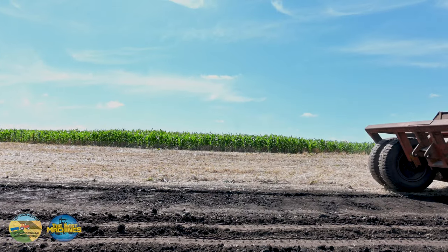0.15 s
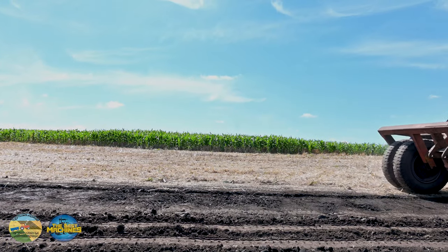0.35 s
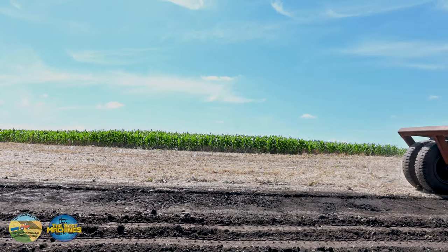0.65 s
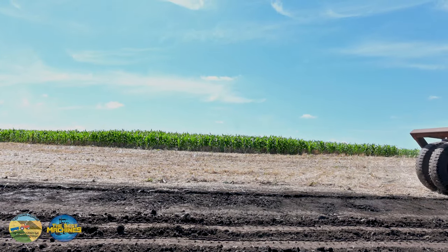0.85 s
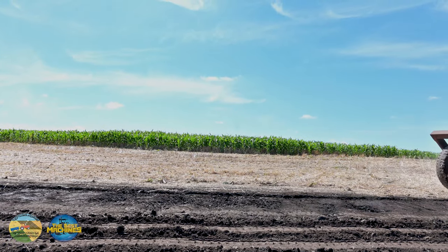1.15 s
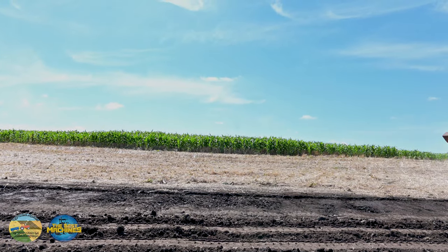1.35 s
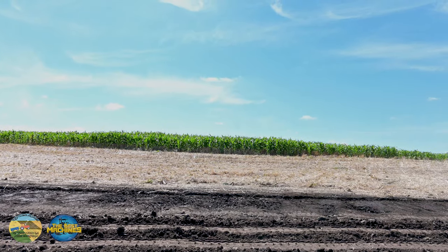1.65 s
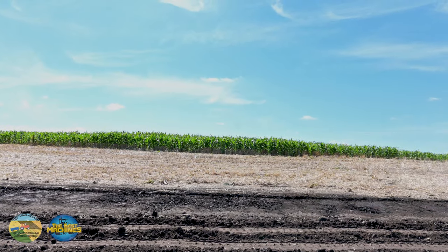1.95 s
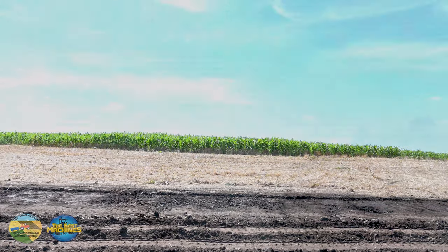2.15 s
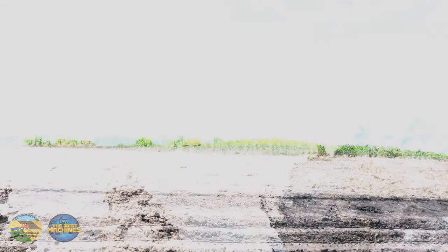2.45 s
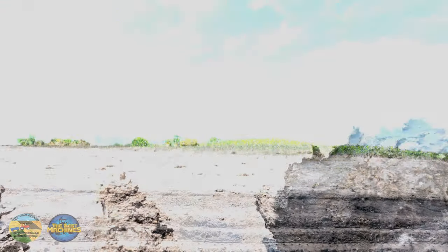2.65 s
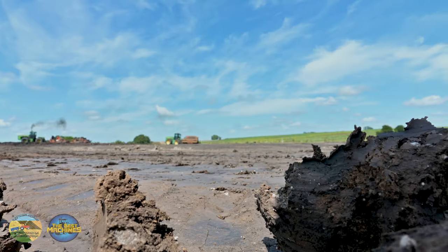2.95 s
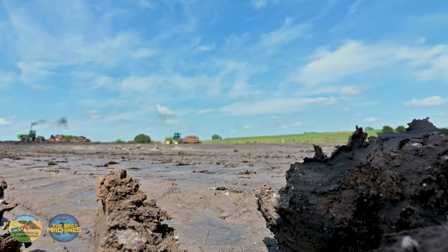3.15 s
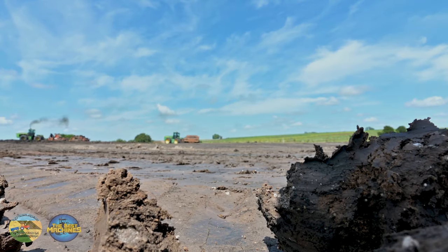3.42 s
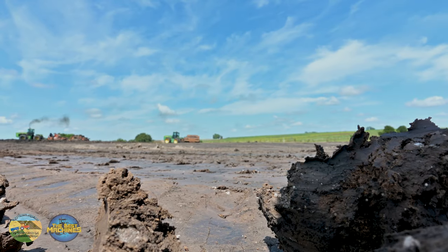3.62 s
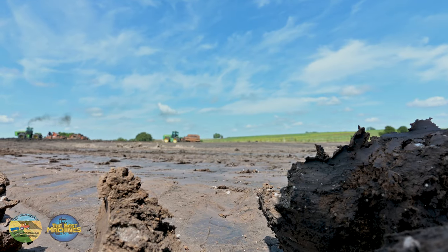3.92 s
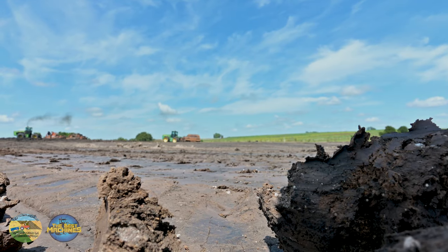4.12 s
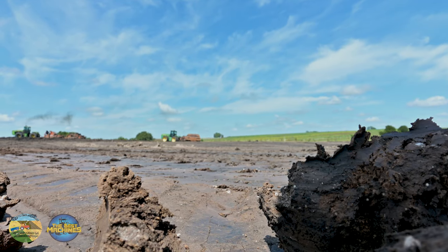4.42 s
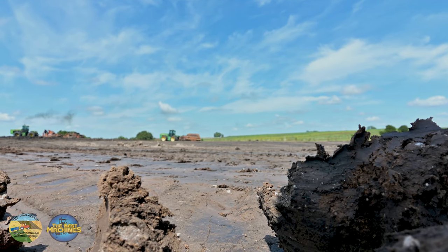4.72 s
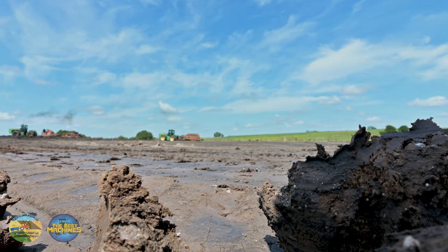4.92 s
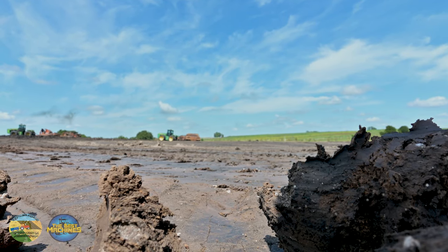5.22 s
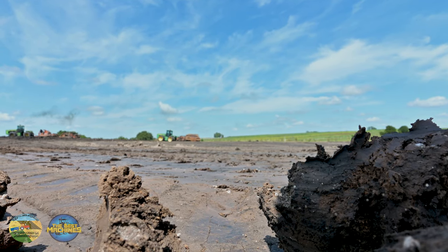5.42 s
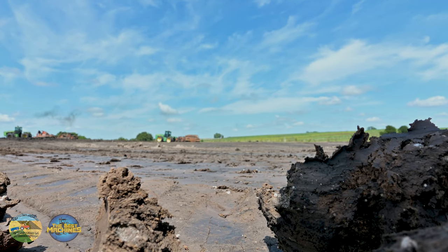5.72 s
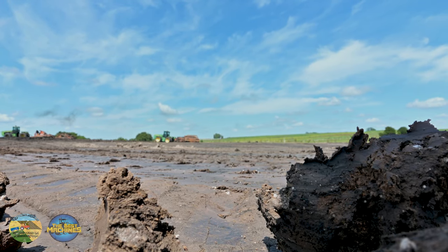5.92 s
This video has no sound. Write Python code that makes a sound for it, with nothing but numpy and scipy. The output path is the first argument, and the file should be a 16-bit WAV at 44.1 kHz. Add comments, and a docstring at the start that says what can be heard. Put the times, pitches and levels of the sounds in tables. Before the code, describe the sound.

Heavy tractor engine drone with scraper bowl clanks, a sudden cut, then a second, higher diesel hum swells up, ticking and buzzing in an open field.

```python
"""A diesel tractor hums and clatters steadily while a scraper's steel bowl knocks and rubs and a thin squeal arches.
That scene is cut off abruptly; a second six-cylinder tractor fades in, takes up its load and draws nearer, ticking.
Engine tones are multiples of the firing rate; rumble, clatter, ringing panels and hiss are shaped noise.
Knocks strike decaying bowl modes and shove the air; the squeal is a gliding sine of unsteady strength.
"""
import sys
import numpy as np
from scipy import signal
from scipy.fft import rfft, irfft
from scipy.io import wavfile

SR = 44100
rng = np.random.default_rng(int(sys.argv[2]) if len(sys.argv) > 2 else 0)


def transcribe(u):
    """Save the signal u as a 16-bit wav file named by the first command-line argument.

    u: samples, shape (n,) or (channels, n), limited to [-1, 1]; the rate is SR.
    q: integer samples, one column per channel.
    """
    v = np.clip(np.atleast_2d(u).T, -1, 1)
    q = np.round(v * 32767).astype(np.int16)
    wavfile.write(sys.argv[1], SR, q)


N = 267687
TIME = np.arange(N) / SR  # s
FREQS = np.maximum(np.arange(N // 2 + 1) * SR / N, 1)  # Hz, kept positive for logarithms


def from_db(db):
    """Decibels to amplitude gain."""
    return 10 ** (np.asarray(db) / 20)


def rms_one(x):
    """Scale to unit rms."""
    return x / np.sqrt(np.mean(x ** 2) + 1e-20)


def in_time(rows):
    """Each column of a time table, linear between rows, at every sample."""
    t_s, *columns = np.transpose(rows)
    return [np.interp(TIME, t_s, column) for column in columns]


def in_frequency(rows):
    """Each column of a spectrum table, linear in log frequency, at every bin."""
    hz, *columns = np.transpose(rows)
    return [np.interp(np.log(FREQS), np.log(hz), column) for column in columns]


def ramp(start_s, length_s):
    """Linear rise from 0 to 1, held either side."""
    return np.clip((TIME - start_s) / length_s, 0, 1)


def drift(rate_hz):
    """Slow random wander of spread 1: noise through two equal poles at rate_hz."""
    step = 40  # samples per slow point
    r = np.exp(-2 * np.pi * step * rate_hz / SR)
    noise = rng.standard_normal(N // step + 2002)
    slow = signal.lfilter([1], [1, -2 * r, r * r], noise)[2000:]  # drop the settling
    return np.interp(np.arange(N) / step, np.arange(len(slow)), rms_one(slow))


def colour(x, gain):
    """Filter by a gain per frequency; rms 1."""
    return rms_one(irfft(rfft(x) * gain, N))


def below(hz):
    """Gain of a steep low-pass."""
    return 1 / np.sqrt(1 + (FREQS / hz) ** 8)


def above(hz):
    """Gain of the power-complementary high-pass."""
    return np.sqrt(1 - below(hz) ** 2)


def resonate(x, resonances):
    """Parallel two-pole resonances of alternating sign; rms 1."""
    out = 0
    for k, (hz, width_hz, db) in enumerate(resonances):
        r = np.exp(-np.pi * width_hz / SR)
        poles = [1, -2 * r * np.cos(2 * np.pi * hz / SR), r * r]
        band = signal.lfilter([1 - r * r, 0, r * r - 1], poles, x)
        out = out + (-1) ** k * from_db(db) * band
    return rms_one(out)


def place(sound, stereo):
    """Row 0 arrives from one direction; row 1, scattered by ground and machine, differs between the ears."""
    pan_db, likeness, lead_rad = in_frequency(stereo)
    apart = above(320) ** 2  # the bass is kept mono, alike in both ears
    pan_db = apart * pan_db
    likeness = 1 - apart * (1 - np.clip(likeness, 0, 1))
    lead_rad = apart * lead_rad
    direct, scattered = rfft(sound)
    sides = np.array([[1], [-1]])  # left, right
    ears = np.sqrt((1 + likeness) / 2) * direct + sides * np.sqrt((1 - likeness) / 2) * scattered
    pan = from_db(sides * pan_db / 2)
    pan = pan / np.sqrt(np.mean(pan ** 2, axis=0))  # keep the power of both ears
    return irfft(ears * pan * np.exp(.5j * sides * lead_rad), N)


def tones(firings, rows):
    """Turning parts sound at fixed multiples of the firing rate, wavering in strength and phase."""
    out = 0
    for multiple, rms_db, unsteady in rows:
        wander = (drift(10.1) + 1j * drift(2.3)) / np.sqrt(2)
        waver = (1 + unsteady * wander) / np.sqrt(1 + unsteady ** 2)
        start = rng.random((2, 1))  # starting phase per row, cycles
        wave = np.real(waver * np.exp(2j * np.pi * (multiple * firings + start)))
        out = out + np.sqrt(2) * from_db(rms_db) * wave
    return out


def bursts(firings, cylinders_db, decay, uneven_db):
    """Each firing opens a burst dying within a share of the interval; cylinders and strokes differ. Rms 1."""
    stroke, since = np.divmod(firings, 1)
    stroke = stroke.astype(int)
    chance = rng.standard_normal(size=1024)
    cylinder_db = np.array(cylinders_db)[stroke % len(cylinders_db)]
    strength_db = cylinder_db + uneven_db * chance[stroke % len(chance)]
    return rms_one(from_db(strength_db) * (np.exp(-since / decay) - np.exp(-8 * since / decay)))


def pulsing(gate, depth):
    """Turbulence noise; a share of its power, depth, follows the bursts."""
    depth = np.clip(depth, 0, 1)
    return np.sqrt(1 - depth + depth * gate ** 2) * rng.standard_normal((2, N))


def cyclic(firings, repeat):
    """Vibration noise; a share of its power comes back alike on every six-firing engine cycle."""
    repeat = np.clip(repeat, 0, 1)
    cycle = rng.standard_normal(size=(2, 3400))
    angle = (firings / 6 % 1 * cycle.shape[1]).astype(int)
    return np.sqrt(repeat) * cycle[:, angle] + np.sqrt(1 - repeat) * rng.standard_normal((2, N))


def hauling_tractor():
    """Steady speed and load: hum, rumble, uneven exhaust bark, ringing panels and dull clatter."""
    # turning parts: [f/firing rate, level/dB rms, unsteadiness]
    tone_rows = [(1, -41, 0.28), (2, -46.5, 0.26), (3, -53.5, 0.79), (1.273, -46.5, 0.253),
                 (1.9, -50.5, 0.93), (4.97, -55.5, 1), (3.604, -44, 0.34), (6.5, -57, 0.7)]
    # roar spectrum: [f/Hz, relative density/dB per Hz]
    roar_rows = [(20, -19), (45, -7.5), (130, -0.5), (300, -5), (520, -17), (800, -24.5), (1400, -20.5),
                 (2700, -26.5), (3600, -33), (6500, -35.5), (8000, -41.5), (11000, -50.5), (15800, -51.5)]
    # exhaust pipe resonances: [f/Hz, width/Hz, relative level/dB]
    pipe = [(310, 57, -1), (518, 53, -1.5), (564, 180, -15)]
    # steel panel resonances: [f/Hz, width/Hz, relative level/dB]
    panel_modes = [(1204, 39, 4), (1334, 76, 1.5), (1560, 61, 1), (1916, 120, 1.5), (2310, 150, -2),
                   (2484, 28, 3.5), (2740, 230, -1.5), (4690, 1100, -13.5), (6750, 210, -13)]
    # cylinders in firing order: [relative strength/dB]
    cylinders_db = [8.5, 3.5, 8.5, 7, 3.5, -12]
    firing_hz = 69.5
    firings = firing_hz * TIME
    roar = from_db(in_frequency(roar_rows)[0])
    gate = bursts(firings + 2.5, cylinders_db, decay=0.47, uneven_db=4.0)
    rumble = from_db(-39.5) * colour(cyclic(firings, repeat=0.28), roar * below(830))
    bark = from_db(-50.5) * colour(resonate(pulsing(gate, depth=0.62), pipe), below(1121))
    panels = from_db(-54.0 + 2.7 * drift(7.0)) * resonate(pulsing(gate, depth=0.16), panel_modes)
    clatter_gain = from_db(-50.5 + 0.13 * drift(11))
    clatter = clatter_gain * colour(pulsing(gate, depth=0.094), roar * above(530))
    return tones(firings, tone_rows) + rumble + bark + panels + clatter


def scraper():
    """The bowl bumps in its pins: knocks strike decaying modes and shove the air; steel rubs as shaped noise."""
    # knocks: [t/s, level/dB]
    knocks = [(0.251, -28.5), (0.335, -34), (1.199, -26.5), (1.903, -27), (2.006, -30), (2.06, -24),
              (2.102, -29), (2.183, -32), (2.232, -26.5), (2.271, -29), (2.326, -28.5)]
    # earth-damped bowl modes: [f/Hz, relative level/dB, t60/s]
    bowl = [(222, -4, 0.048), (390, -10, 0.021), (570, -6, 0.024), (746, -9, 0.013), (972, -14, 0.022),
            (1376, -25, 0.051), (1900, -16.5, .02)]
    # steel rubbing on steel: [centre t/s, level/dB, 1/e half-width/s]
    rubs = [(0.005, -43.5, 0.015), (1.05, -46.5, 0.03)]
    bowl_gain_db, shove_gain_db, shove_hz = 1.0, 0.8, 188
    at = [round(t_s * SR) for t_s, db in knocks]
    knock_db = np.array(knocks)[:, 1:]
    # every knock strikes the modes in a slightly different balance
    strengths = from_db(knock_db + 0.53 * rng.standard_normal((len(knocks), len(bowl))))
    out = np.zeros((2, N))
    for k, (hz, db, t60_s) in enumerate(bowl):
        blows = np.zeros(N)
        blows[at] = strengths[:, k] * from_db(bowl_gain_db + db)
        r = np.exp(-np.log(1000) / (t60_s * SR))
        w = 2 * np.pi * hz / SR
        poles = [1, -2 * r * np.cos(w), r * r]
        out[0] += (-1) ** k * signal.lfilter([0, np.sin(w)], poles, blows + 1e-18)
    # the bowl's mass shoves the air through one sine cycle per knock
    shove = np.zeros(N)
    shove[at] = from_db(shove_gain_db + knock_db[:, 0])
    swing = np.arange(round(SR / shove_hz))
    out[0] -= signal.fftconvolve(shove, np.sin(2 * np.pi * swing / len(swing)))[:N]
    rubbing = sum(from_db(db) * np.exp(-((TIME - t_s) / width_s) ** 2) for t_s, db, width_s in rubs)
    rub_modes = [(1005, 79, -9), (1290, 250, -21), (1880, 250, -15)]  # f/Hz, width/Hz, relative level/dB
    scrape = colour(resonate(rng.standard_normal((2, N)), rub_modes), below(2500))
    return out + rubbing * scrape


def squeal():
    """Running gear squeals faintly: a thin broken sine glides up and sinks again."""
    start_s, length_s = 1.78, 0.61
    low_hz, rise_hz, jitter_hz = 11200, 2100, 400
    level_db, fall_db = -78.5, 7
    progress = ramp(start_s, length_s)
    arch = np.abs(np.sin(np.pi * progress))
    hz = low_hz + rise_hz * arch + jitter_hz * drift(200)
    fading = from_db(level_db - fall_db * progress)
    strength = fading * np.sqrt(arch) * drift(60)
    return strength * np.sqrt(2) * np.sin(2 * np.pi * np.cumsum(hz) / SR)


def near_speed():
    """Firings per second: the engine sags under load, then its governor hunts with a growing swing."""
    free_hz, sag_hz, load_on_s, sag_s = 76.25, 0.8, 4.05, 0.35
    hunt_hz, hunt_period_s, hunt_build_s = 0.33, 0.57, 0.5
    settled_s = load_on_s + sag_s
    swing = np.cos(2 * np.pi * (TIME - settled_s) / hunt_period_s)
    hunting = ramp(settled_s, hunt_build_s) * swing
    return free_hz - sag_hz * ramp(load_on_s, sag_s) + hunt_hz * hunting


def nearing(start_db, db_per_s):
    """Gain of a part that grows at a steady dB rate as the tractor draws nearer."""
    nearing_s = 3.5
    return from_db(start_db + db_per_s * np.maximum(TIME - nearing_s, 0))


def near_tractor():
    """Exhaust hum beats against the fan; firings shake the panels and every cycle gives a bright tick."""
    # exhaust: [f/firing rate, level/dB rms, unsteadiness]
    exhaust = [(1, -28, 0.11), (2, -30.5, 0.2), (2.5, -43.5, 0.44), (3, -41.5, 0.72), (4.5, -42, 0.55),
               (6, -49, 0.13)]
    # fan, drive and gears: [f/firing rate, relative level/dB, unsteadiness]
    fan = [(2.237, -2, 0.045), (6.335, -17.5, 0.2), (8.14, -20.5, 0.54)]
    drive_rows = [(3.797, -6, 0.62), (4.325, -7, 0.2), (4.63, -2.5, 0.08)]
    gear_rows = [(10.656, -1.5, 0.4), (11.01, -16.5, 0.94), (11.41, -7.5, 0.34), (25.1, -29, 0.79)]
    # gear whine: [t/s, level/dB]
    whine = [(3.5, -36.5), (4.04, -46), (4.93, -45.5), (5.05, -34), (5.86, -36), (6.05, -55)]
    # roar spectrum: [f/Hz, relative density/dB per Hz]
    roar_rows = [(25, -19), (50, -13), (110, -4.5), (250, -0.5), (420, -9), (520, -8.5), (850, -7),
                 (1050, -9.5), (1800, -17), (2600, -19), (3800, -23.5), (6000, -31.5), (10000, -32.5),
                 (15800, -31.5)]
    # muffler and bonnet, panels and fuel lines, loose panel, turbocharger: [f/Hz, width/Hz, relative level/dB]
    boom_modes = [(319.6, 48, 1), (530.5, 42, 1.5), (632, 46, -0.5), (697, 58, 0), (848, 57, -4)]
    panel_modes = [(1063, 46, 0.5), (1159.5, 16.4, 5.5), (1234, 50, 0.5), (1496, 31, 1.5),
                   (1650, 110, -2.5), (1869, 25, 2), (2018, 40, -7.5), (2276, 145, -7), (2483, 58, -8),
                   (2846, 55, -6.5), (3110, 72, -10)]
    buzz_modes = [(1502, 85, 2.5), (1630, 35, 3.5)]
    turbo_modes = [(7170, 96, 3), (6970, 320, 0.5)]
    # cylinders in firing order: [relative strength/dB]
    cylinders_db = [0.6, 0.93, -0.56, -0.94, 2.2, -0.1]
    drive_off_s, drive_fall_db_per_s = 5.58, 30  # drive relieved, its hum dies away
    firings = np.cumsum(near_speed()) / SR
    [whine_db] = in_time(whine)
    relief_db = drive_fall_db_per_s * np.maximum(TIME - drive_off_s, 0)
    roar = from_db(in_frequency(roar_rows)[0])
    hum = tones(firings, exhaust) + nearing(-31.5, db_per_s=2) * tones(firings, fan)
    drive = nearing(-39.0 - relief_db, db_per_s=3.5) * tones(firings, drive_rows)
    gears = from_db(whine_db) * tones(firings, gear_rows)
    gate = bursts(firings, cylinders_db, decay=0.36, uneven_db=1.2)
    rumble = nearing(-34.5, db_per_s=1.03) * colour(cyclic(firings, repeat=0.46), roar * below(860))
    boom = from_db(-36.5) * colour(resonate(pulsing(gate, depth=0.38), boom_modes), below(1140))
    panels = nearing(-42.0, db_per_s=0.82) * resonate(pulsing(gate, depth=0.2), panel_modes)
    buzz = nearing(-63, db_per_s=8) * resonate(pulsing(gate, depth=0.33), buzz_modes)
    clatter_band = roar * above(1630) * below(7440)
    clatter = nearing(-43.5, db_per_s=0.82) * colour(pulsing(gate, depth=0.16), clatter_band)
    tick = bursts(firings / 6 + 0.17, [0], decay=0.27, uneven_db=1.5)  # one per engine cycle
    hiss = nearing(-54.5, db_per_s=3.5) * colour(pulsing(tick, depth=0.25), roar * above(5700))
    turbo = nearing(-63.0, db_per_s=3.5) * resonate(rng.standard_normal((2, N)), turbo_modes)
    return hum + drive + gears + rumble + boom + panels + buzz + clatter + hiss + turbo


def scene():
    """The first scene is cut off abruptly; the second swells in on a cubic fade."""
    # direction, evened out at low f: [f/Hz, left-right level/dB, likeness of the ears 0-1, left lead/rad]
    haul_stereo = [(250, -0.1, 0.999, -0.0), (500, -1.3, 0.957, -0.1), (800, -4.1, 0.743, -0.1),
                   (1200, -0.7, 0.438, -0.8), (1700, -1.4, 0.632, -2.9), (2600, -1.9, 0.719, -2.7),
                   (4500, 2.8, 0.518, -2.4), (6200, 6.1, 0.576, 0.3), (8000, 2.7, 0.393, -0.2),
                   (12000, 0.8, 0.177, -1.4)]
    near_stereo = [(300, -0.0, 1.0, -0.0), (550, -1.2, 0.994, -0.2), (900, -2.1, 0.959, -0.7),
                   (1400, -4.8, 0.51, -2.5), (2000, -6.2, 0.673, -2.0), (4000, -0.3, 0.689, -3.1),
                   (5500, -1.9, 0.503, -4.8), (8000, -0.6, 0.555, -6.2), (11000, 2.7, 0.468, -8.1),
                   (15000, 5.2, 0.2, -9.1)]
    cut_s, fade_start_s, fade_end_s = 2.512, 2.556, 3.572
    hauling = place(hauling_tractor() + scraper(), haul_stereo) + squeal()
    fade = ramp(fade_start_s, fade_end_s - fade_start_s) ** 3
    return (TIME < cut_s) * hauling + fade * place(near_tractor(), near_stereo)


def record(dry):
    """The top is cut steeply: gain falls linearly to zero at the cutoff."""
    cutoff_hz, slope_hz = 15900, 150
    return irfft(rfft(dry) * np.clip((cutoff_hz - FREQS) / slope_hz, 0, 1), N)


dry = scene()
out = record(dry)
transcribe(out)
```